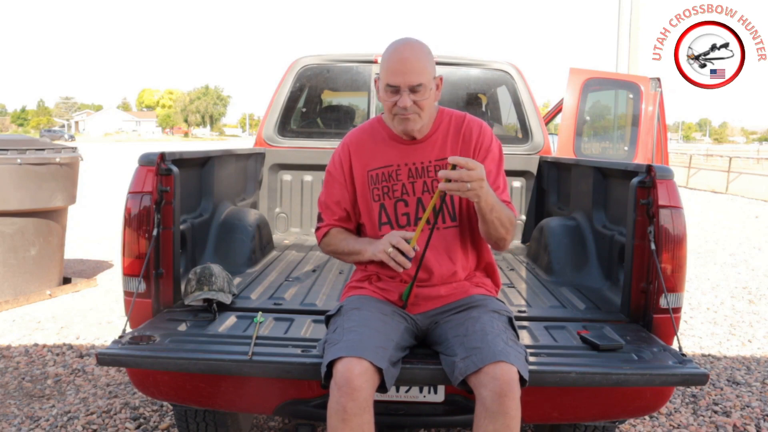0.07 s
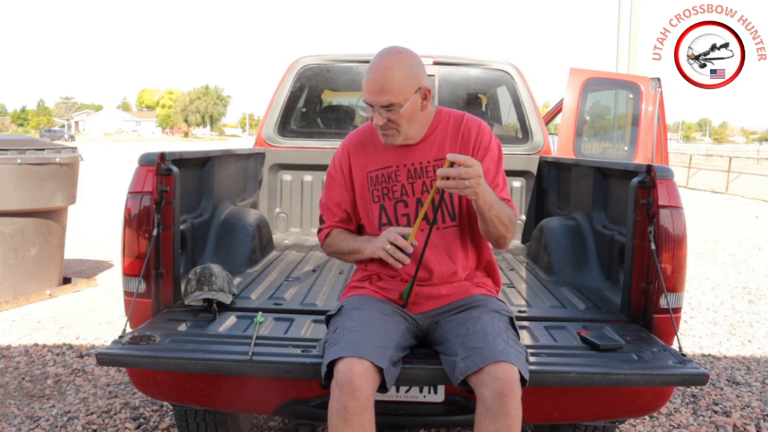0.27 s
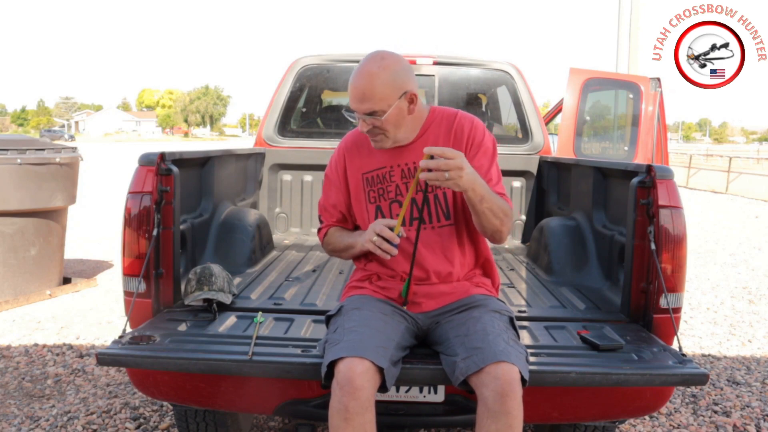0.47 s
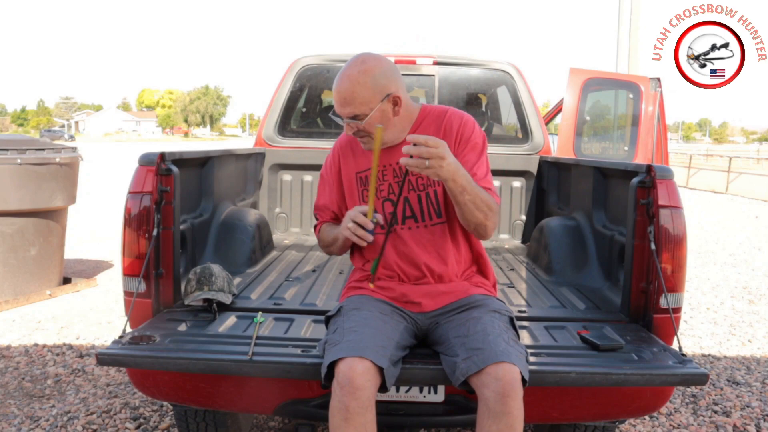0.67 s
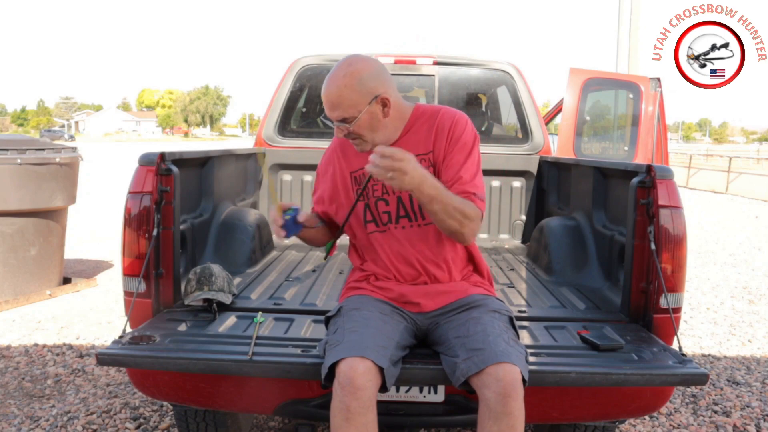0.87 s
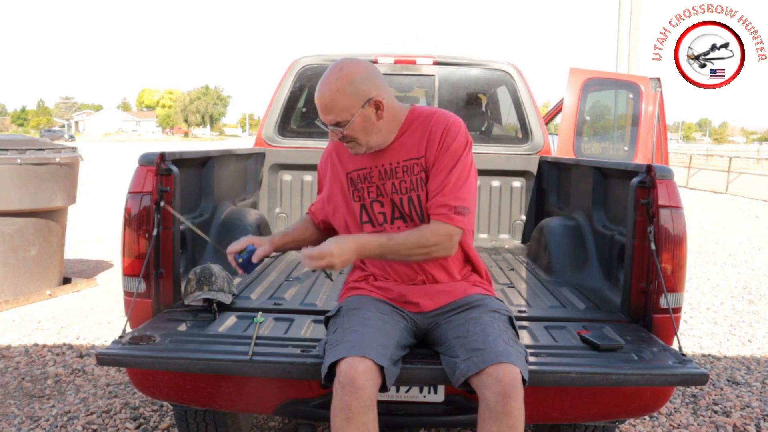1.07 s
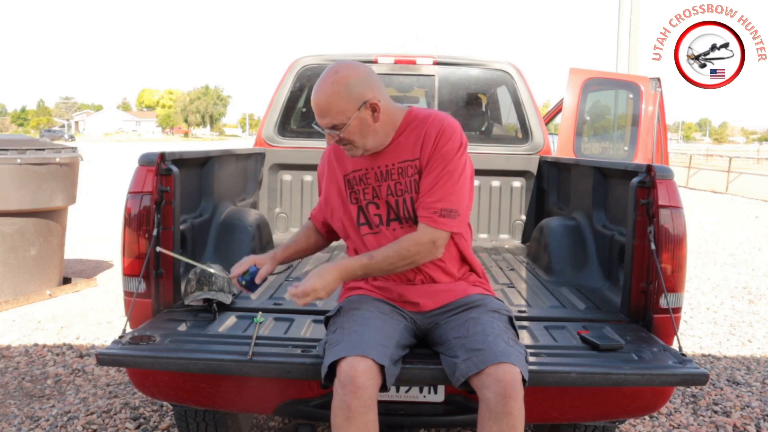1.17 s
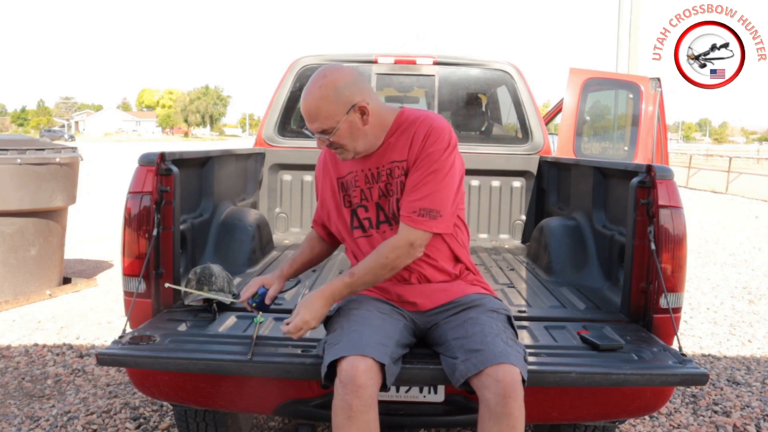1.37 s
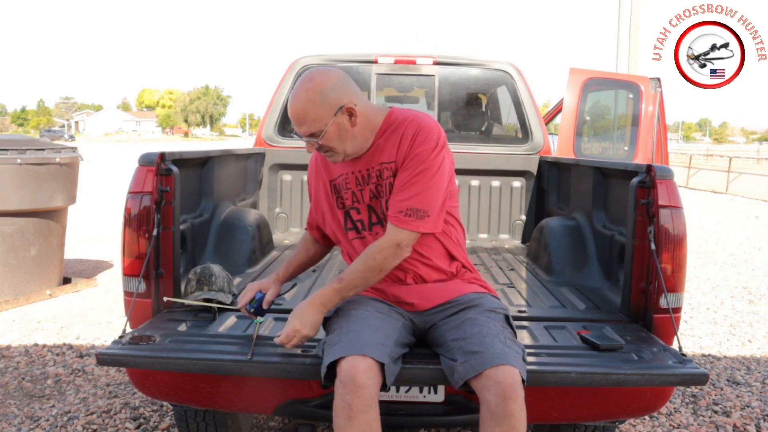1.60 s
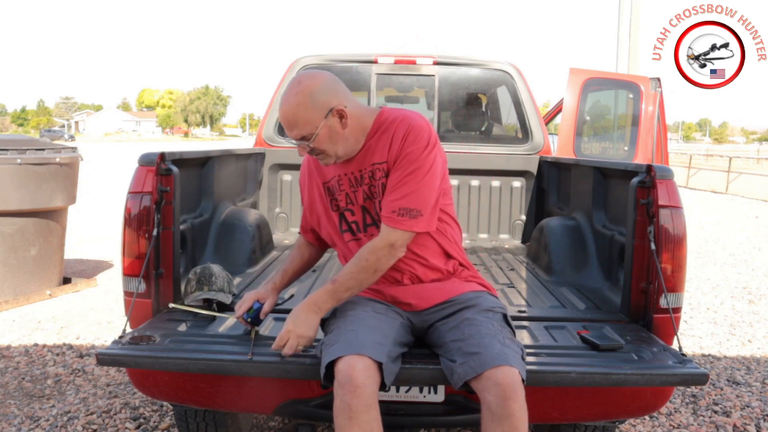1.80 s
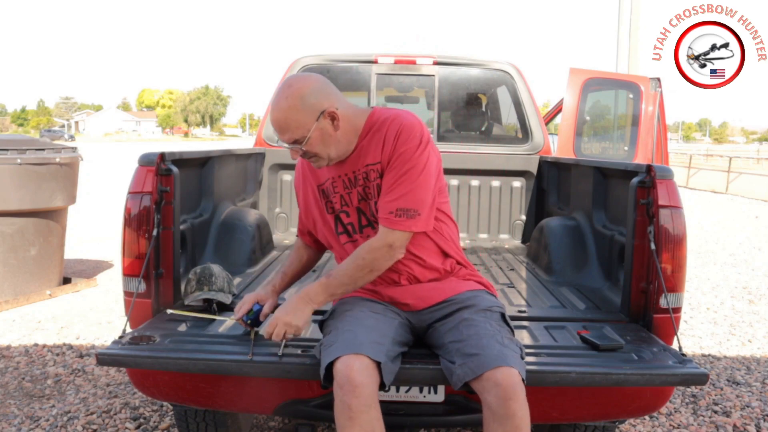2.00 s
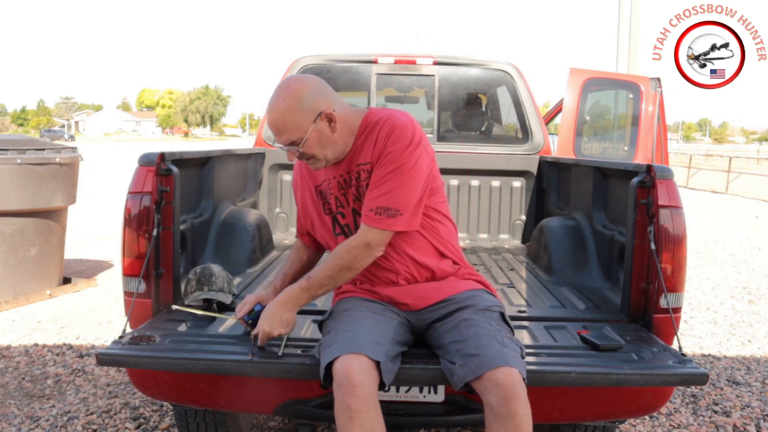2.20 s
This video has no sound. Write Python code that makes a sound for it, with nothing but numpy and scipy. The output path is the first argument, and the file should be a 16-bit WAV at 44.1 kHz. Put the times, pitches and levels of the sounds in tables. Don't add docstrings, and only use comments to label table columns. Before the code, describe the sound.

A tape measure ticks and rustles lightly, an arrow smacks a truck tailgate and bounces, then the tape's case knocks down with a short rattle. Quiet open air, low hum, soft hiss and small far birds.

```python
import sys
import numpy as np
from scipy import signal
from scipy.fft import rfft, irfft, next_fast_len
from scipy.io import wavfile
from scipy.ndimage import uniform_filter1d, map_coordinates

SR = 44100
rng = np.random.default_rng(int(sys.argv[2]) if len(sys.argv) > 2 else 0)


def to_wav(sig):
    pcm = np.clip(np.atleast_2d(sig), -1, 1) * 32767
    pcm = np.round(pcm).astype(np.int16)
    wavfile.write(sys.argv[1], SR, pcm.T)


def boost_factor(decibels):
    exponent = np.asarray(decibels, float) / 20
    return 10 ** exponent


N = 99136

# start [s], peak level [dB], brightness [dB per octave].
ARROW_HITS = [
    (1.6495, -46, 14),
    (1.6522, -30, 3),
    (1.6536, -11, 1),
    (1.66, -23, -2),
    (1.6672, -24, -2),
    (1.7488, -22, -3.5),
    (1.755, -31.5, -5.5),
    (1.762, -26.5, -4.5),
]
# start [s], peak level [dB], brightness [dB per octave].
CASE_HITS = [(1.9563, -31.5, 1.5), (1.968, -36, -9), (1.982, -46, 0), (1.998, -40, -8),
             (2.008, -34.5, -7.5), (2.018, -45, 8), (2.0555, -16, 2.5), (2.0615, -23, -4), (2.067, -26, -2),
             (2.074, -35.5, 4), (2.088, -28.5, 0), (2.092, -24.5, -1.5), (2.099, -31, -1),
             (2.107, -27, -4.5), (2.127, -34.5, -5), (2.137, -39, -6), (2.149, -45, -5),
             (2.163, -51.5, -11)]
# frequency [Hz], level [dB], decay by 60 dB [s].
ARROW_MODES = [(629, -23.5, 0.21), (816, -26, 0.3), (934.3, -11.5, 0.086), (1050, -5, 0.036),
               (1412, -4, 0.046), (1508, -0.5, 0.065), (2020, -8, 0.069), (2414, -4, 0.079),
               (2940, -20, 0.18), (3370, -10, 0.041), (3530, -10, 0.072), (4040, -16, 0.063),
               (4540, -15, 0.045), (5100, -2.5, 0.021)]
# frequency [Hz], level [dB], decay by 60 dB [s].
CASE_MODES = [(580.3, -18.5, 0.24), (640, -9.5, 0.093), (822.3, -11.5, 0.13), (913.4, -8.5, 0.1),
              (1005.4, -8.5, .12), (1303, -14, 0.18), (1500, -8, 0.12), (1687, -5.5, 0.11),
              (1845, -11, 0.039), (2560, -12, 0.089), (3031, -14, 0.044), (3640, -11.5, 0.046),
              (4680, -20, 0.044), (5300, -22, 0.059)]
# frequency [Hz], density [dB per Hz].
ARROW_PANEL = [(100, -19.5), (400, -27.5), (1000, -11.5), (2400, -5.5), (5000, -10.5), (8800, -20),
               (11000, -44), (16000, -39)]
# frequency [Hz], density [dB per Hz].
CASE_PANEL = [(100, -16), (260, -11.5), (450, -26), (1000, -7), (2200, -7.5), (8100, -32.5), (11000, -45),
              (16000, -57)]
# frequency [Hz], decay by 60 dB [s].
PANEL_T60 = [(200, 0.21), (800, 0.16), (2000, 0.072), (5000, 0.053), (12000, 0.02)]
# frequency [Hz], decay by 60 dB [s].
BED_T60 = [(800, 0.54), (5000, 0.35), (12000, 0.34)]
# start [s], peak level [dB], brightness [dB].
TICKS = [(0.391, -37, -1), (0.3956, -37, -3), (0.657, -29.5, -3.5), (0.6608, -22, 10), (0.661, -26, 5),
         (.6775, -31, -3), (.6952, -39, -6), (0.7022, -31.5, 7), (.7875, -42.5, -9), (0.8515, -37, 14),
         (1.0144, -31, 4), (1.030, -36, 4), (1.062, -35.5, -4), (1.094, -38, -10), (1.251, -45, -12)]
# start [s], peak level [dB], brightness [dB].
RATTLES = [
    (0.428, -36, 10),
    (0.432, -62, 11),
    (1.7796, -32, -15),
    (1.968, -31, -10),
    (1.982, -44, 4),
    (2.0077, -32, 6),
    (2.0214, -46, -5),
]
# start [s], peak level [dB], brightness [dB].
SNAPS = [(0.095, -45, -9), (.7195, -46, -4), (0.7346, -38.5, -8), (0.828, -51, -3), (.8365, -47, 13),
         (.8437, -45, 11), (.8492, -38, 8), (0.854, -26.5, 11), (.8623, -33, -6), (.8685, -41, -6),
         (1.001, -48, -9), (1.018, -37, 1), (1.0345, -48, 7), (1.1068, -35.5, -13), (1.1205, -40, -20),
         (2.002, -44, 12), (2.03, -45, 14), (2.037, -38, -6), (2.227, -50, -8)]
# start [s], length [s], level [dB], brightness [dB].
SLIDES = [
    (0.635, 0.13, -55.5, -2.5),
    (0.82, 0.073, -54, -1.5),
    (1.005, 0.11, -52.5, -7.5),
    (1.953, 0.061, -51, -10.5),
]
# frequency [Hz], density [dB per Hz].
BLADE = [(600, -14), (1500, -15), (3200, -0.5), (6300, -9), (8700, -4), (10300, -19), (13600, -3.5),
         (15700, -8)]
# start [s], frequency [Hz], peak level [dB].
KNOCKS = [
    (0.392, 1370, -42),
    (0.4298, 1430, -42.5),
    (1.108, 2830, -48),
    (1.2506, 2430, -43),
    (1.654, 225, -35),
]
# start [s], length [s], first pitch [Hz], last pitch [Hz], level [dB].
NOTES = [(0.165, 0.112, 5690, 3984, -72), (0.29, .014, 4860, 4730, -71), (0.312, 0.0096, 3080, 3520, -66),
         (.343, 0.009, 3200, 3500, -69), (.368, 0.013, 3470, 3840, -75), (.645, 0.027, 4440, 4410, -59.5),
         (0.689, 0.029, 3680, 3490, -66.5), (1.304, 0.0215, 4670, 3800, -66),
         (1.326, .007, 4030, 4600, -66), (1.34, 0.016, 3450, 3820, -64), (1.347, 0.013, 2180, 2980, -72), ]
# delay [s], length [s], first, middle and last pitch [Hz].
TRILL = [
    (0.004, .022, 3550, 4350, 4950),
    (.026, .015, 4250, 3650, 4250),
    (.042, .011, 4600, 3800, 2950),
    (.055, .02, 3000, 3780, 3300),
    (.076, .01, 3000, 2950, 2800),
]
TRILL_DB = [-7, 0, -5, -7, -7]
# start [s], level [dB].
TRILLS = [
    (0.911, -50.5),
    (1.3601, -52),
]
# start [s], length [s], centre [Hz], width [Hz], level [dB].
FLOCK = [(.04, .26, 5130, 700, -73), (.27, .17, 3800, 1200, -66), (.284, .06, 4700, 600, -69),
         (.558, .05, 4100, 600, -66), (.6, .12, 3100, 450, -64.5), (.93, .08, 4000, 1400, -64),
         (1.143, .28, 5200, 900, -70), (1.379, .31, 3460, 1310, -65), (1.41, .06, 4400, 250, -69),
         (1.528, .085, 4200, 500, -66), (1.584, .05, 3120, 300, -64), (1.804, .16, 5500, 900, -70),
         (1.83, .12, 2370, 200, -67)]
# frequency [Hz], decay by 60 dB [s].
GARDEN_T60 = [(2500, 0.44), (6000, 0.074)]
# frequency [Hz], density [dB per Hz].
HUM = [(30, -19), (60, 3.5), (90, -2.5), (150, 3), (300, -3.5), (900, -10), (2500, -23), (5000, -34)]
# frequency [Hz], density [dB per Hz].
HISS = [(880, -8), (1500, -2), (2750, -8), (3460, 0), (4310, -6), (14400, -13.5), (16200, -14)]
# frequency [Hz], threshold [sigma].
HOLES_ABOVE = [(5000, 4), (8000, 2.3), (10500, 1.7), (16000, 2.1)]
# frequency [Hz], level [dB].
WIDE = [(60, -20), (300, -24), (1000, -18.5), (3000, -18), (6000, -10), (12000, -8)]
# frequency [Hz], threshold [sigma].
KEPT_ABOVE = [(100, -.4), (900, 1), (6000, .2), (11000, .9)]
# start [s], length [s], lowest frequency [Hz], gain [dB].
WIDE_OPEN = [
    (1.64, .15, 0, -40),
    (2.02, .14, 0, -40),
    (.40, .055, 0, 0),
    (.64, .055, 0, 0),
    (1.648, .04, 4500, 0),
    (1.945, .055, 0, 0),
    (2.005, .01, 5000, 4),
    (2.05, .03, 4500, 8),
]


def clacks(hits, modes, panel, ring_db, panel_db):
    out, t = np.zeros(N), np.arange(SR // 3) / SR
    for s, db, bright_db in hits:
        tilt = lambda hz: boost_factor(bright_db * np.log2(np.maximum(hz, 500) / 2000))
        ring = np.zeros(len(t))
        for hz, level_db, t60 in modes:
            uneven_db = rng.normal(0, 3.4)
            phase = 2 * np.pi * hz * (t + s) + 0.87 * drift(len(t), rate=80)
            ring += tilt(hz) * boost_factor(level_db + uneven_db - 60 * t / t60) * np.sin(phase)
        shake = dying(PANEL_T60, 1 / 3, lambda hz: tilt(hz) * boost_factor(along(panel, hz)))[:len(t)]
        shake = shake / np.sqrt(np.mean(shake[:400] ** 2))
        onset = 1 - np.exp(-t / 0.00017)
        add(out, s, boost_factor(db) * onset * (boost_factor(ring_db) * ring + boost_factor(panel_db) * shake))
    low_hz = 110
    return filtered(out, lambda hz: (1j * hz / (low_hz + 1j * hz)) ** 3)


def blade(bright_db, top_hz=SR):
    def response(hz):
        tilt_db = bright_db * 0.64 * np.log2(np.maximum(hz, 2300) / 6000)
        return boost_factor(along(BLADE, hz) + tilt_db) / (1 + (hz / top_hz) ** 10)
    return response


def puffs(events, t60, top_hz=SR):
    out, t = np.zeros(N), np.arange(SR // 20) / SR
    rise_s = 0.0005
    for s, db, bright_db in events:
        shape = boost_factor(db - 9.5 - 60 * t / t60) * (1 - np.exp(-t / rise_s))
        noise = unit(filtered(rng.standard_normal(len(t)), blade(bright_db, top_hz)))
        add(out, s - rise_s, shape * noise)
    return out


def slides():
    out = np.zeros(N)
    for s, length, db, bright_db in SLIDES:
        shape = swell(length, rise=0.17) ** 0.91
        grain_db = 8.7 * uniform_filter1d(rng.standard_normal(SR // 5), size=60)
        grit = boost_factor(grain_db) * rng.standard_normal(SR // 5)
        add(out, s, boost_factor(db) * shape * unit(filtered(grit, blade(bright_db)))[:len(shape)])
    return out


def tape():
    clicks = puffs(TICKS, t60=0.023) + puffs(RATTLES, t60=0.023, top_hz=10500)
    return clicks + puffs(SNAPS, t60=0.016) + slides()


def knocks():
    out, t = np.zeros(N), np.arange(SR // 8) / SR
    cycles = 15
    for s, hz, db in KNOCKS:
        add(out, s, boost_factor(db - 60 * t * hz / cycles) * np.sin(2 * np.pi * hz * t))
    return out


def single_notes():
    out = np.zeros(N)
    bend, waver_hz = 45, 110
    for s, length, first_hz, last_hz, db in NOTES:
        shape = swell(length, rise=0.59)
        u = np.linspace(0, 1, len(shape))
        hz = last_hz + (first_hz - last_hz) * (1 - u) * np.exp(-bend * length * u)
        hz = hz + waver_hz * (length < .07) * drift(SR // 5, rate=150)[:len(u)]
        add(out, s, boost_factor(db + 6) * shape ** 0.27 * np.sin(2 * np.pi * np.cumsum(hz) / SR))
    return out


def trills():
    out = np.zeros(N)
    waver_hz, flutter_db = 110, 4
    for s, db in TRILLS:
        for (after, length, *arc_hz), syllable_db in zip(TRILL, TRILL_DB):
            shape = swell(length, rise=0.6) ** 0.13
            n = len(shape)
            parabola = np.polyfit([0, .5, 1], arc_hz, deg=2)
            hz = np.polyval(parabola, np.linspace(0, 1, n))
            hz = hz + waver_hz * (syllable_db < 0) * drift(SR // 10, rate=300)[:n]
            flutter = flutter_db * drift(SR // 10, rate=236)[:n]
            level = boost_factor(db + syllable_db + flutter)
            add(out, s + after, level * shape * np.sin(2 * np.pi * np.cumsum(hz) / SR))
    return out


def flock():
    out = np.zeros(N)
    for s, length, hz, width_hz, db in FLOCK:
        shape = swell(length, rise=0.15) ** 0.2
        band = lambda f: (1j * f * width_hz / (hz * hz - f * f + 1j * f * width_hz)) ** 2
        wash = unit(filtered(rng.standard_normal(SR // 3), band))
        add(out, s, boost_factor(db) * shape * wash[:len(shape)])
    return out


def birds():
    near, call = single_notes(), trills()
    echoes = echoed(near + boost_factor(-3) * call, GARDEN_T60)
    return near + call + boost_factor(-5) * echoes + flock()


def ambience():
    sway = map_coordinates(rng.standard_normal(30), [np.arange(N) * 8 / SR])
    hum = unit(filtered(rng.standard_normal((2, N)), lambda hz: boost_factor(along(HUM, hz))))
    hiss = unit(filtered(rng.standard_normal((2, N)), lambda hz: boost_factor(along(HISS, hz))))
    return hum * boost_factor(-56.5 + 0.67 * sway) + boost_factor(-66.5) * hiss


def random_patches(shape, bands, frames):
    field = uniform_filter1d(rng.standard_normal(shape), size=bands, axis=0)
    return unit(uniform_filter1d(field, size=frames, axis=1))


def holed(air):
    hz, t, z = signal.stft(air, SR, nperseg=256)
    hole = random_patches(z.shape, bands=4, frames=14) > along(HOLES_ABOVE, hz)[:, None]
    return signal.istft(z * boost_factor(-16 * hole), SR, nperseg=256)[1][:N]


def patchy(side):
    hz, t, z = signal.stft(side, SR, nperseg=512)
    gate = 1. * (random_patches(z.shape, bands=9, frames=8) > along(KEPT_ABOVE, hz)[:, None])
    for s, length, above_hz, db in WIDE_OPEN:
        gate[np.ix_(hz >= above_hz, (t >= s) & (t <= s + length))] = boost_factor(db)
    return signal.istft(z * gate, SR, nperseg=512)[1][:N]


def unit(x):
    return x / np.sqrt(np.mean(x ** 2) + 1e-20)


def along(points, hz):
    f, v = np.transpose(points)
    return np.interp(np.log(hz + 1), np.log(f + 1), v)


def filtered(x, response):
    m = next_fast_len(x.shape[-1] + 4096)
    return irfft(rfft(x, m) * response(np.fft.rfftfreq(m, 1 / SR)), m)[..., :x.shape[-1]]


def dying(t60s, seconds, gain=lambda hz: 1 + 0 * hz):
    n = round(seconds * SR)
    hz, t, z = signal.stft(rng.standard_normal(n + 128), SR, nperseg=128)
    decay = boost_factor(-60 * t / along(t60s, hz)[:, None])
    return signal.istft(z * gain(hz)[:, None] * decay, SR, nperseg=128)[1][:n]


def echoed(x, t60s):
    tail = dying(t60s, seconds=.4)
    return signal.fftconvolve(x, tail / np.linalg.norm(tail))[:N]


def swell(length, rise):
    u = np.arange(round(length * SR)) / (length * SR)
    return np.minimum(u / rise, (1 - u) / (1 - rise)).clip(0, 1)


def drift(count, rate):
    points = rng.standard_normal(int(.4 * rate) + 9)
    return map_coordinates(points, [np.arange(count) * rate / SR + 2])


def add(track, s, sound):
    k = round(s * SR)
    track[k:k + len(sound)] += sound[:N - k]


def scene():
    hits = clacks(ARROW_HITS, ARROW_MODES, ARROW_PANEL, ring_db=-6, panel_db=-9)
    hits = hits + clacks(CASE_HITS, CASE_MODES, CASE_PANEL, ring_db=-11, panel_db=-8)
    near = hits + boost_factor(-18) * echoed(hits, BED_T60) + tape() + knocks() + birds()
    air, apart = ambience()
    mid = near + holed(air)
    scatter = rng.standard_normal(64) / 8
    side = apart + boost_factor(-3.5) * np.convolve(near, scatter)[:N]
    side = filtered(side, lambda hz: boost_factor(along(WIDE, hz)))
    return np.array([mid + side, mid - side])


def band_limit(x):
    return signal.sosfilt(signal.butter(12, 16800, fs=SR, output="sos"), x)


def record(dry):
    ceiling, top_hz = 0.42, 15850
    limited = dry / np.hypot(1, (dry / ceiling) ** 2) ** .5
    left, right = filtered(limited, lambda hz: hz < top_hz)
    mid, side = (left + right) / 2, patchy((left - right) / 2)
    return band_limit(np.array([mid + side, mid - side]))


dry = scene()
out = record(dry)
to_wav(out)
```